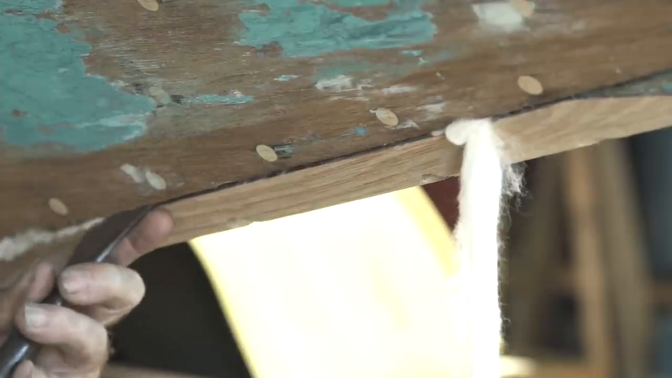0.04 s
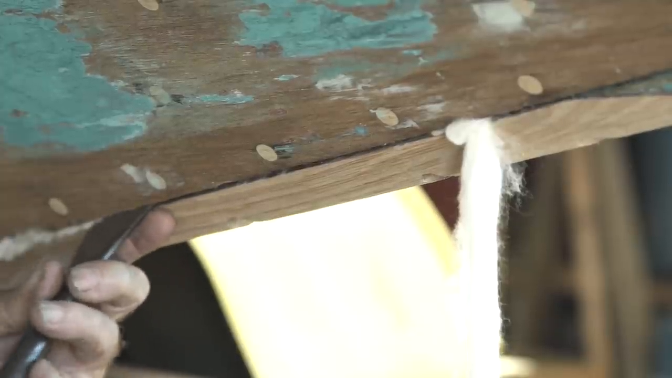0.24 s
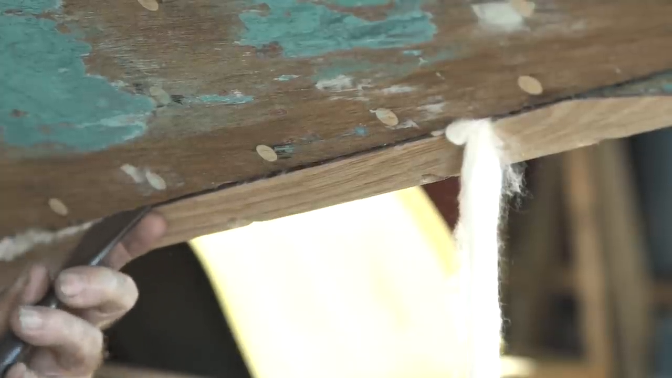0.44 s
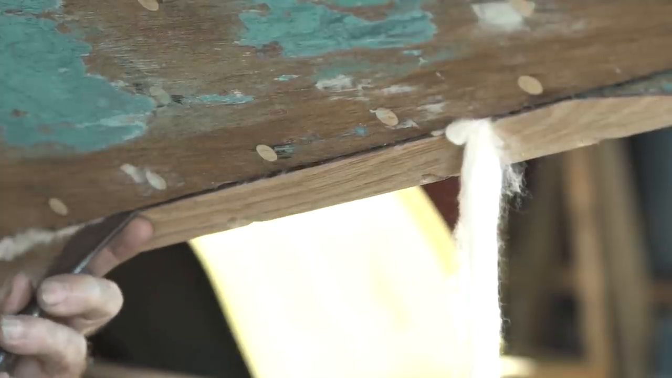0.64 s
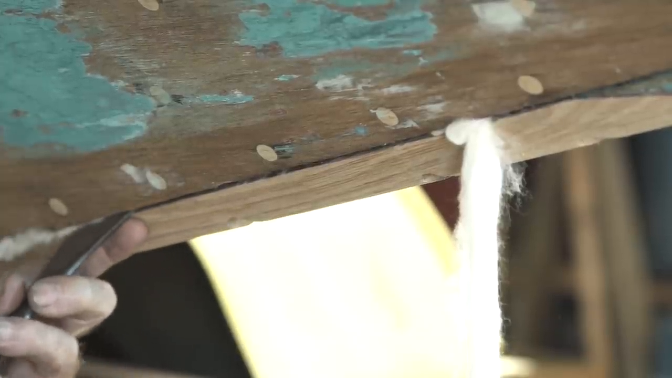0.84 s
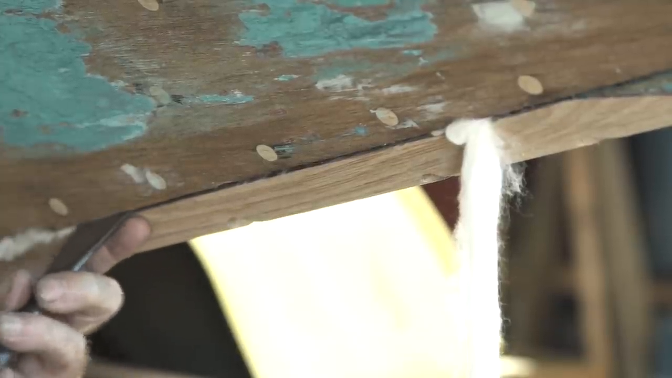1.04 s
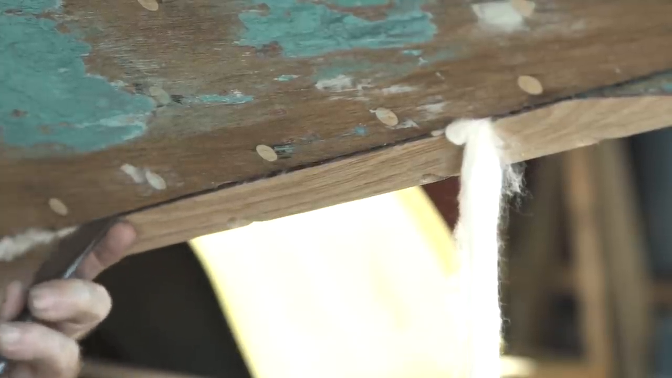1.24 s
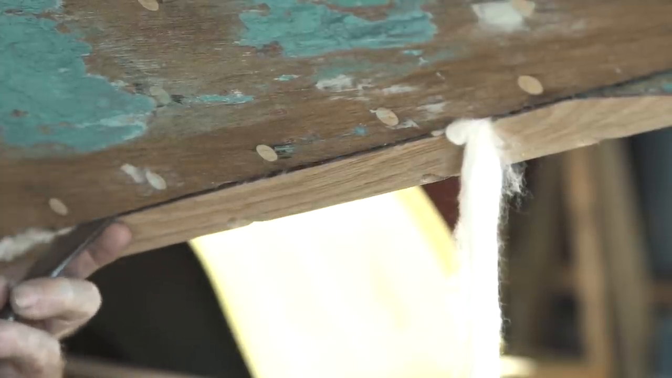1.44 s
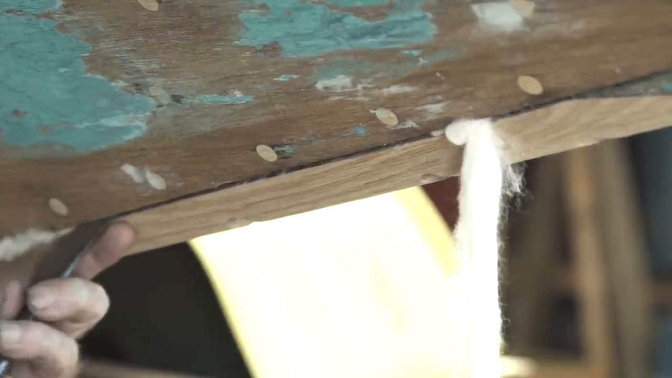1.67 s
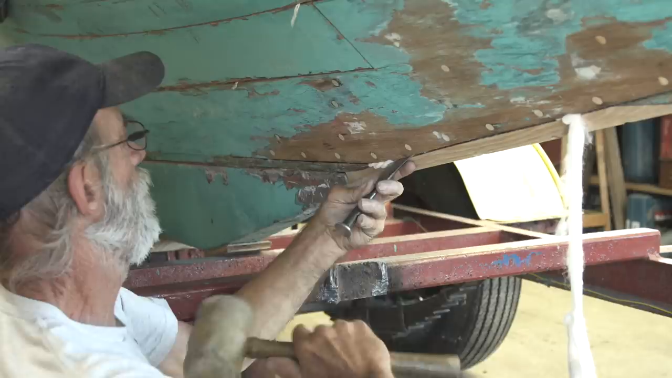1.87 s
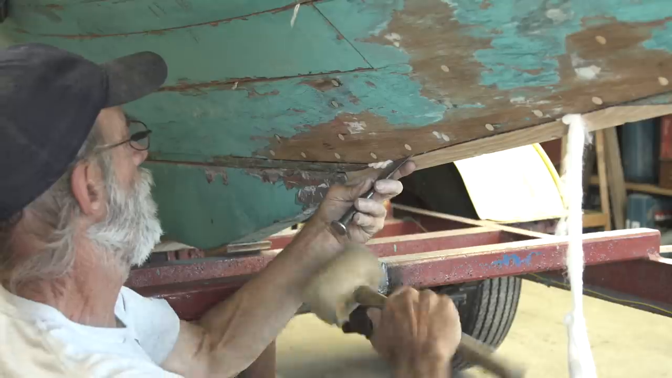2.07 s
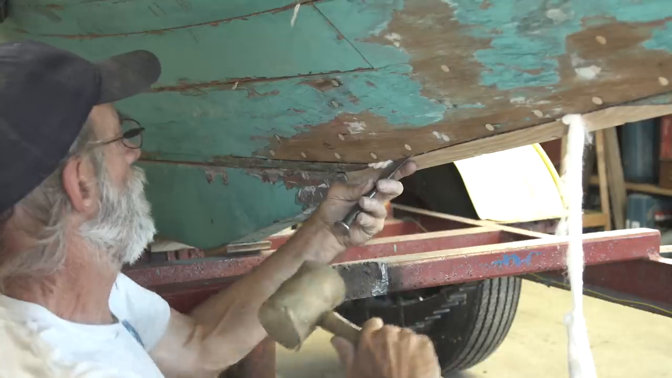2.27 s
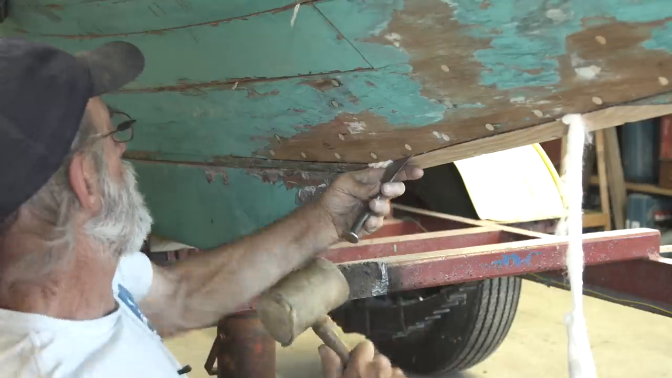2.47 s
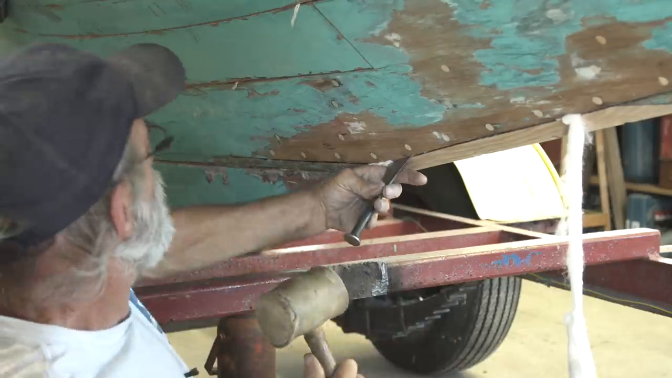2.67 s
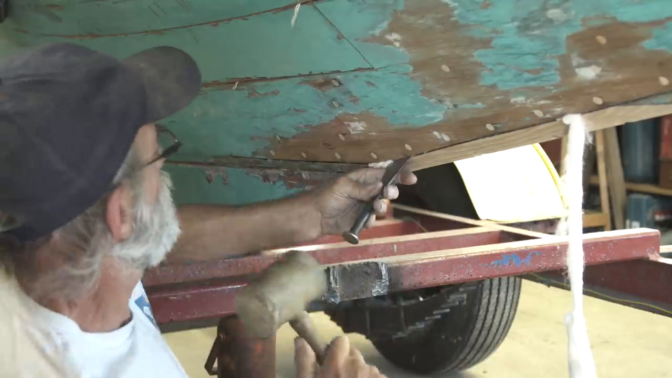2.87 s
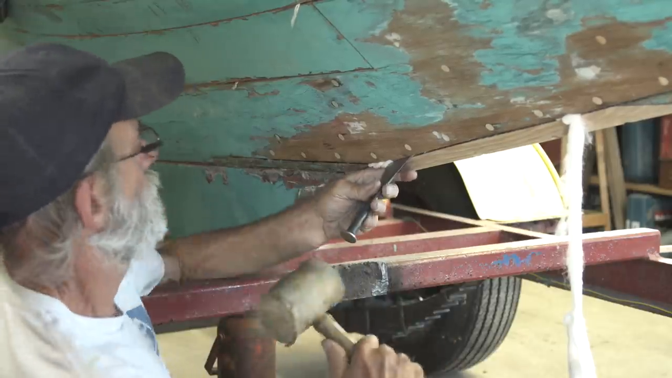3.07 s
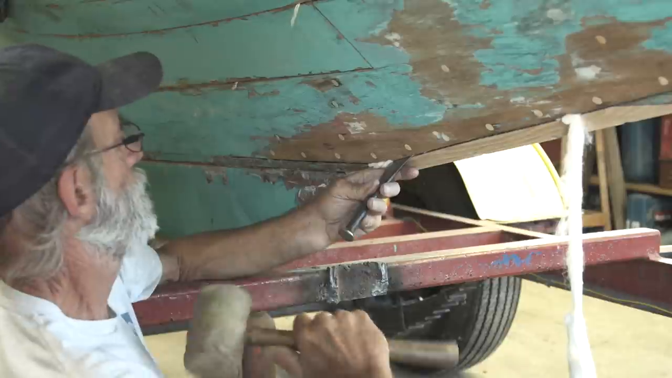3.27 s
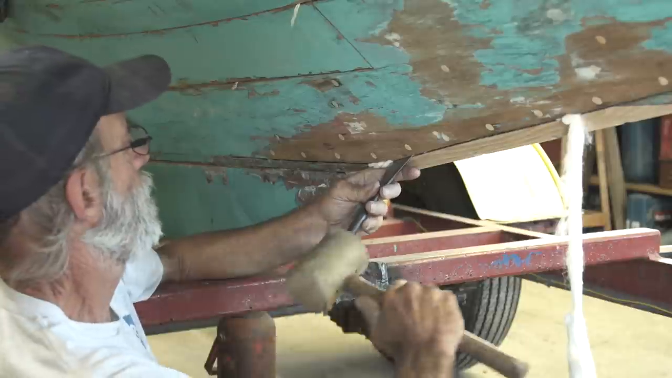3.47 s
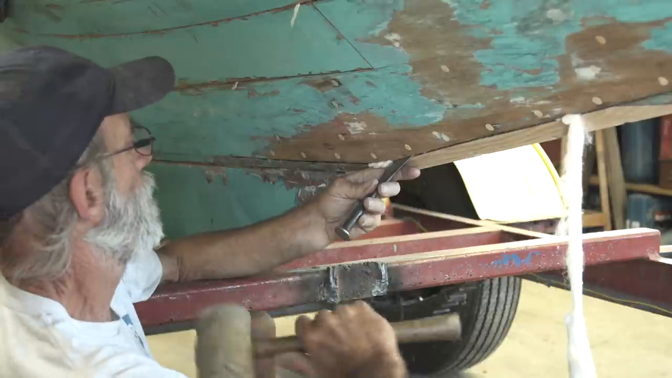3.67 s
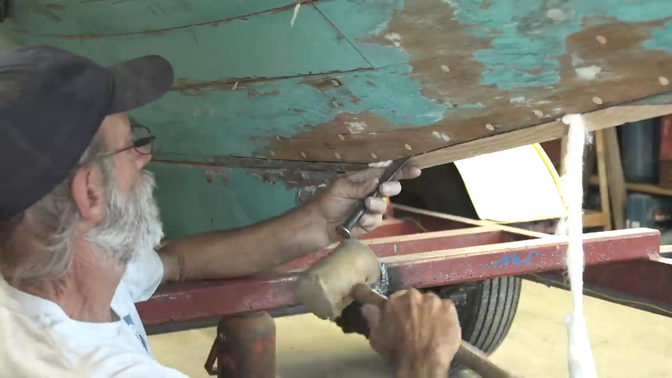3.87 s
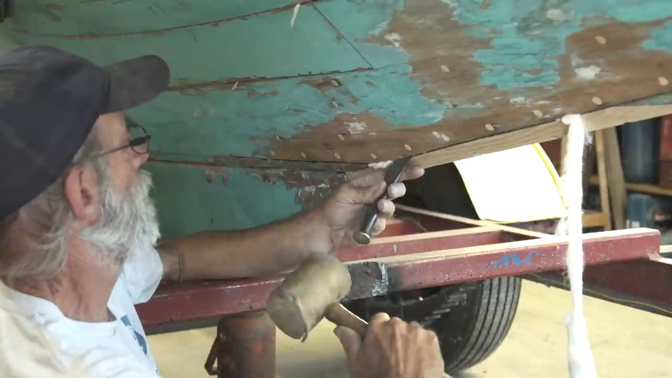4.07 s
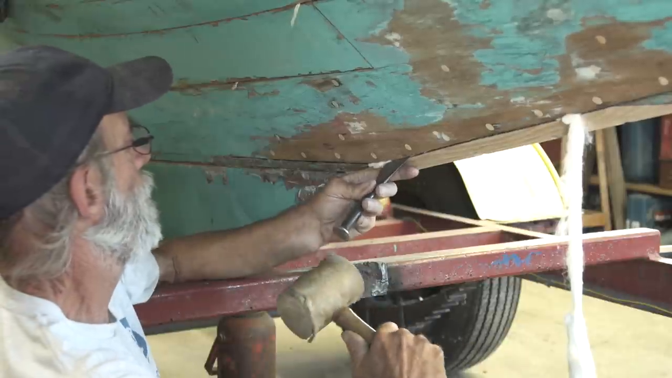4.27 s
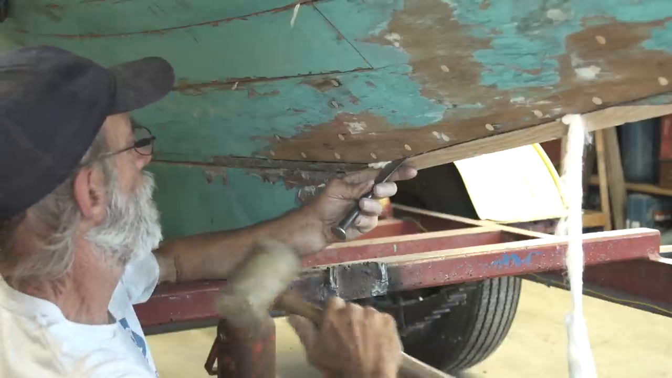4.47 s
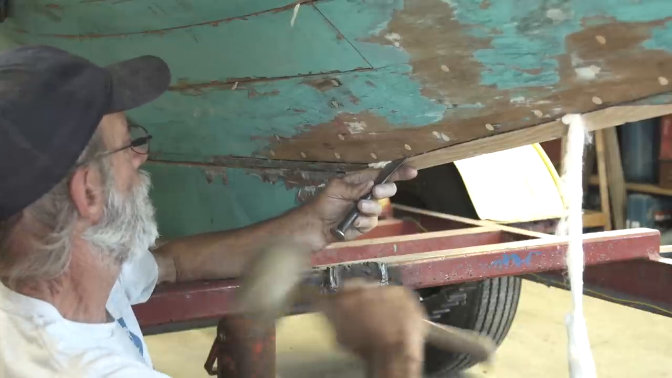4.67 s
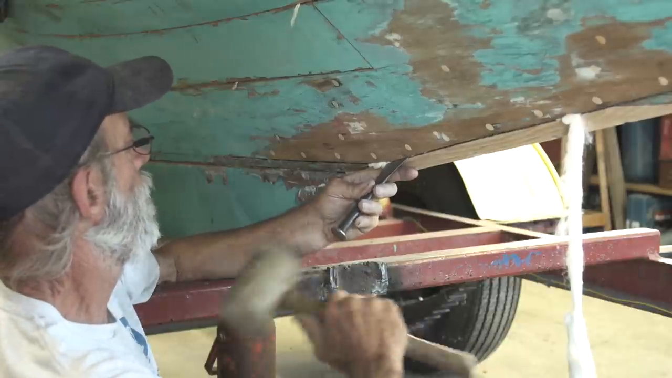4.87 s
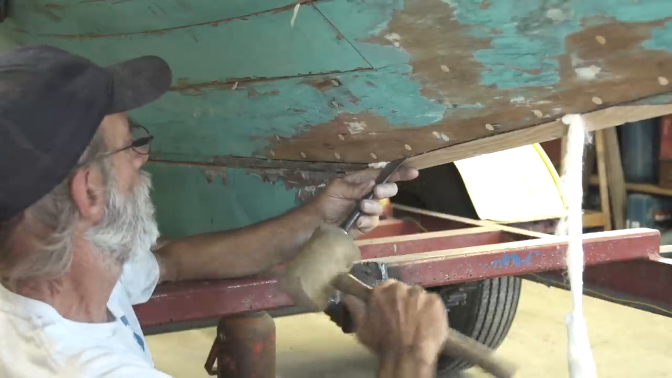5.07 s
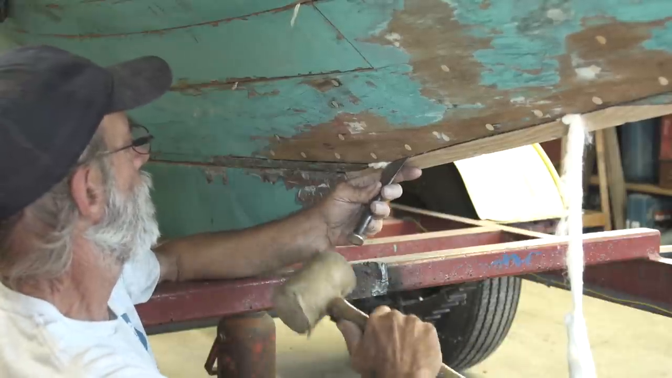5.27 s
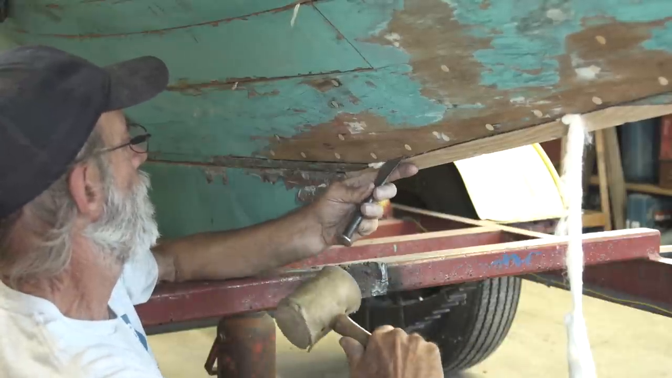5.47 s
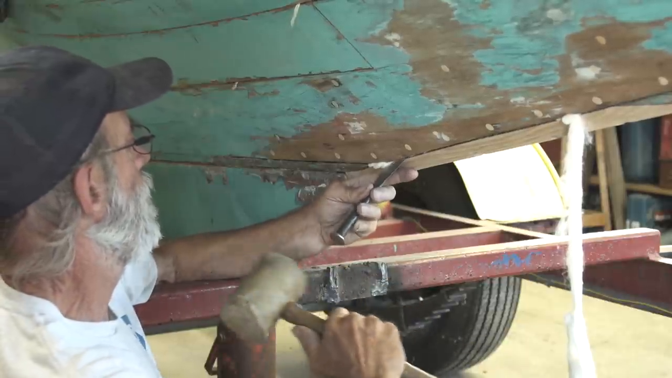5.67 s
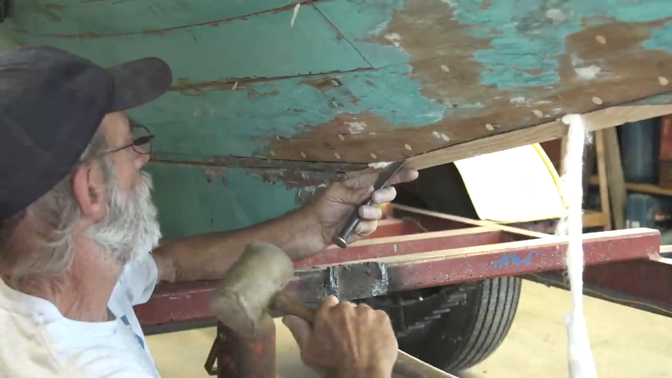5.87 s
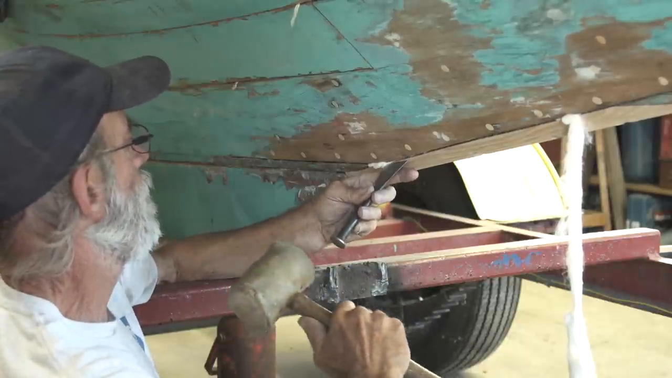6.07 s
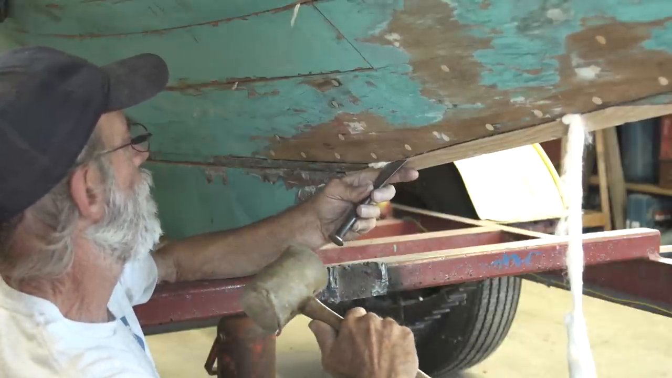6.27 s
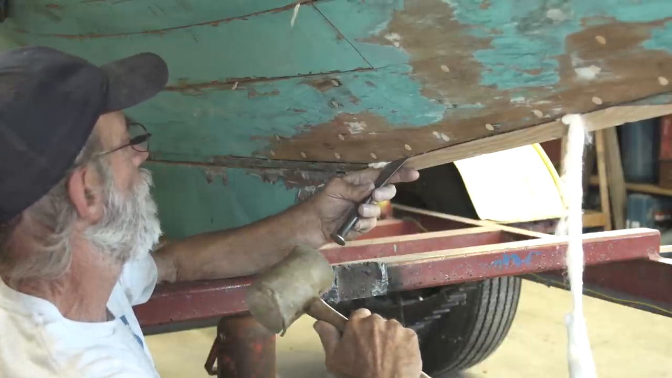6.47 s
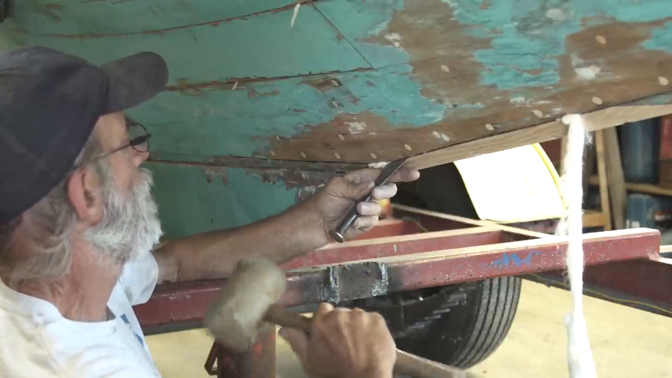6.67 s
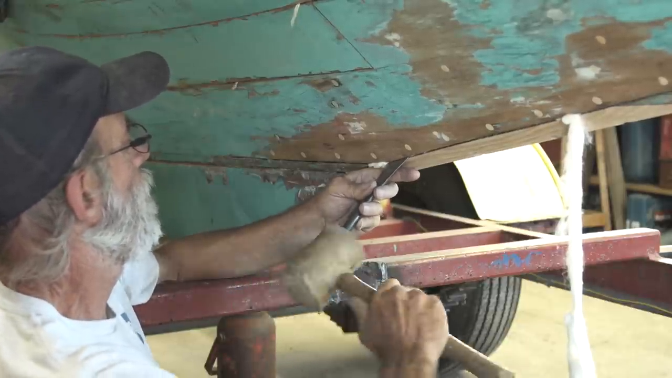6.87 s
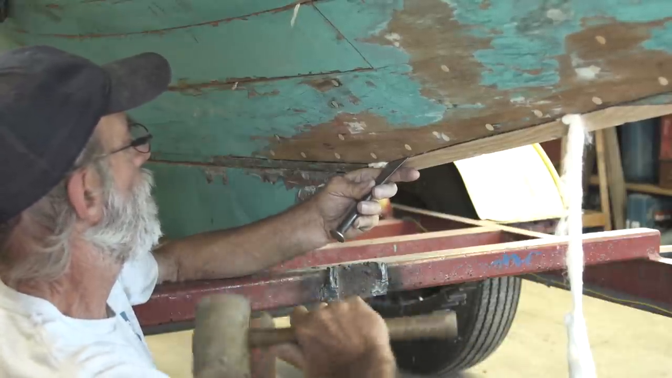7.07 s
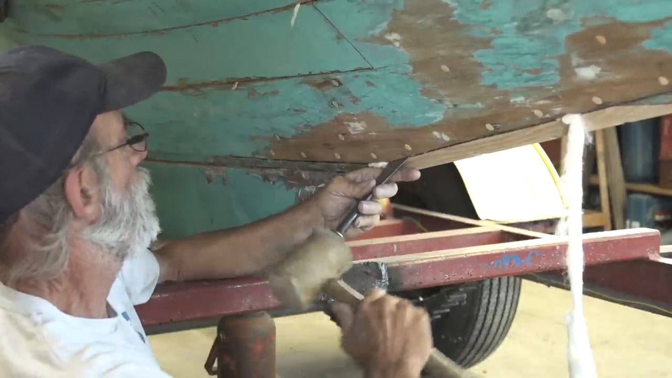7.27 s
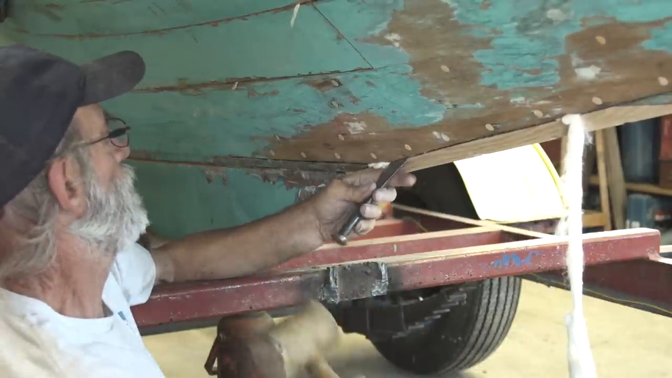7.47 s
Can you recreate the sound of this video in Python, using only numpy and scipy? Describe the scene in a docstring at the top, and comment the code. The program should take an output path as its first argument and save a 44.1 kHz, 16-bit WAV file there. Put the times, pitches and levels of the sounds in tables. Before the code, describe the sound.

Uneven, loud mallet blows on a metal caulking iron resound through a hollow wooden hull, with faint clicks, bumps and rustling in the pauses.

```python
"""A blow is already dying away, and more follow: a mallet drives a caulking iron into a wooden boat's seam.
Each blow, in a shed, sums a noise crack, ringing modes of hull and iron, pushes of air and a noise tail.
Between blows come clicks and soft wooden bumps (short tuned noise), tinkles, a slip and a drumming nudge.
Behind lie shaped-noise air, cloth rustle and a faint hum of wavering sines.
One microphone hears it all, and the loud peaks flatten at its input stage."""
import sys
import numpy as np
from scipy import signal
from scipy.fft import rfft, irfft
from scipy.io import wavfile

SR = 44100
rng = np.random.default_rng(int(sys.argv[2]) if len(sys.argv) > 2 else 0)


def dump(signal):
    """Clip the signal to [-1, 1] and save it as 16-bit WAV at the path in sys.argv[1]."""
    limited = np.clip(np.atleast_2d(signal).T, -1, 1)
    pcm = np.round(limited * 32767).astype(np.int16)
    wavfile.write(sys.argv[1], SR, pcm)


N = 331191
T = np.arange(round(.9 * SR)) / SR  # time within one short sound, s

# colour of the shed's diffuse tail: pitch_hz, level_db (per Hz)
SHED_TONE = [(30, -12.5), (60, -4.5), (100, 5), (300, 1), (520, -0.5), (1100, -2.5), (1450, -5.5),
             (1900, -14), (2800, -10.5), (3700, -20), (5200, -17), (6300, -23.5), (9000, -25.5),
             (15000, -34)]


def mallet(alike=.6):
    """Each blow sums crack, wood, iron and shed; all blows have partly alike tails."""
    # mallet blows: start_s, strength_db, firmness (iron's seat, -1 loose to 1 home), bright_db, ring_db
    blows = [(-.27, 3, -0.97, 2, 2), (0.229, 2, -0.16, -0.5, 0), (1.0392, 0, -.7, -1, 2),
             (1.5427, 0, -0.61, -4, 6), (2.124, -1, 0.66, -5.5, 1.5), (3.527, 0, 0.26, -3, 2),
             (3.8648, -0.65, 0.8, -0.5, 2), (4.7908, 2, -1, -0.5, 0.5), (5.1587, -0.6, 0.56, 0.5, -3),
             (6.9369, -3, -0.62, 3.5, 2), (7.2593, -1, 1, 4.5, -2)]
    dead_until_s, dead_db_per_s = 2.0, 15.5  # a deader stretch of seam: these blows also die faster
    out = np.zeros(N)
    shared = noise(SHED_TONE, len(T))
    for start_s, strength_db, firmness, bright_db, ring_db in blows:
        dead = start_s < dead_until_s
        blow = crack() + planking() + amp(ring_db) * iron() + shed_tail(shared, alike)
        blow = blow * amp(strength_db - dead * dead_db_per_s * T)
        blow = colour(blow, blow_tone(firmness, bright_db, dead))
        add(out, start_s, colour(blow, uneven(1.7)))
    return out


def crack():
    """The hard contact: a burst of noise whose bands die at their own speeds."""
    # colour of the crack: pitch_hz, level_db (per Hz)
    crack_tone = [(60, -29.5), (200, -15), (450, -11), (780, -3), (1200, -2.5), (1800, -8.5), (2700, -6.5),
                  (4000, -12), (7000, -17.5), (15000, -36.5)]
    # decay of the crack: pitch_hz, t60_s
    crack_t60 = [(200, 0.075), (800, 0.058), (2000, 0.029), (8000, 0.035)]
    return amp(-0.5) * dying(noise(crack_tone, len(T)), crack_t60) * swell(0.00049)


def planking():
    """The boom of the planked hull, ringing in its modes, with pushes of air close by."""
    # modes of the planked hull: pitch_hz, level_db, t60_s
    hull_modes = [(76, -10.5, 0.86), (92.6, -5.5, .55), (117.5, -3.5, 0.15), (139.4, -5.5, 0.65),
                  (179.4, -6, 0.79), (235.4, -1.5, .6), (268, -2.5, 0.27), (325.2, 0.5, 0.37),
                  (342.6, -10, 0.59), (426.5, -10.5, 0.84), (483.4, -5, 0.55), (633, -17, 0.37),
                  (796, -7.5, 0.28), (844, -6.5, 0.74), (980, -11.5, 0.35), (1024, -13, 0.46),
                  (1072, -6, 0.53), (1130, -8.5, 0.43), (1211, -8, 0.62), (1370, -12, 0.4)]
    return (amp(-30.0) * ring(hull_modes) + amp(-14.5) * pushes()) * swell(0.0027)


def pushes(count=5, scatter=.03):
    """Air pushes bounce between hull and nearest surfaces, each weaker and higher than the last."""
    gap_s, first_hz, rise_hz, fall_db = .0091, 110, 17, 3.5
    k = np.arange(count)[:, None]
    delay_s = gap_s * (k + 1 + scatter * rng.standard_normal(k.shape))
    u = (np.pi * (first_hz + rise_hz * k) * (T - delay_s)) ** 2
    swings = (1 - 2 * u) * np.exp(-u)  # one swing of pressure each
    return (amp(-fall_db * k) * swings).sum(0)


def iron():
    """The caulking iron rings in its modes, damped by the hand."""
    # modes of the hand-held iron: pitch_hz, level_db, t60_s
    iron_modes = [(2330, -3.5, 0.13), (2750, 0, 0.51), (2760, -2, .42), (3000, -2.5, 0.41),
                  (3850, -13.5, .35), (4360, -9.5, 0.57), (4950, -8.5, .38), (5300, -9, .36),
                  (5780, -12, .5), (6934, -14, .4), (7650, -13, .33), (11700, -19.5, 0.42)]
    return amp(-41.0) * ring(iron_modes, vary_db=0.5)


def shed_tail(shared, alike):
    """The shed's diffuse tail: noise partly shared between blows, dying band by band."""
    # decay of the shed: pitch_hz, t60_s
    shed_t60 = [(100, 0.48), (500, 0.57), (1100, 0.65), (2800, 0.61), (5000, 0.52), (8000, 0.45),
                (14000, .25)]
    diffuse = np.sqrt(alike) * shared + np.sqrt(1 - alike) * noise(SHED_TONE, len(T))
    return amp(-18.0) * dying(diffuse, shed_t60) * swell(0.0037)


def blow_tone(firmness, bright_db, dead):
    """Colour of one blow, from its seat, squareness and place on the seam, as (Hz, dB)."""
    # colour that all blows share: pitch_hz, level_db
    common_tone = [(110, 0.5), (300, -.5), (600, -2.23), (1100, 2.5), (1700, -0.6), (2600, 0.12),
                   (6500, -3)]
    # a firm iron drives the hull's low boom, a loose one thuds: pitch_hz, level_db (per unit of firmness)
    firm_tone = [(110, 2), (300, 7.5), (600, -3.5), (1100, 1), (2600, -.5)]
    # the deader stretch of seam, with less knock: pitch_hz, level_db
    dead_tone = [(110, 0.5), (300, 0), (600, 2), (1100, -6), (1700, 2.5), (6500, -1.5)]
    hz = np.geomspace(50, 16000, 120)
    treble = read([(1500, 0), (8000, 1)], hz)  # a squarer blow is brighter above 1500 Hz
    level_db = read(common_tone, hz) + firmness * read(firm_tone, hz)
    level_db = level_db + bright_db * treble + dead * read(dead_tone, hz)
    return np.c_[hz, level_db]


def uneven(depth_db, count=60):
    """Each blow lands on another spot of the iron's head and favours other overtones, as (Hz, dB)."""
    hz = np.geomspace(1300, 15000, count)
    level_db = depth_db * rng.standard_normal(count)
    level_db[0] = 0  # the pitches below stay as they are
    return np.c_[hz, level_db]


def clicks():
    """The iron and fingers click as the iron is reset: brief bright puffs."""
    # clicks: start_s, level_db, pitch_hz, t60_s, tail_db (cut further in light_contacts)
    click_rows = [(.690, -53.5, 3500, 0.022, -10.5), (.893, -62, 5070, 0.032, -10.5),
                  (2.5665, -32.5, 2900, 0.007, -32), (4.468, -62.5, 4954, .03, -9.5),
                  (4.593, -58.5, 1888, 0.033, -9.5), (4.711, -65.5, 3998, 0.035, -5),
                  (5.538, -52, 3990, 0.036, -9.5), (5.590, -42, 914, 0.029, -9)]
    return light_contacts(click_rows, below_db=2.5, above_db=-10.5, tail_t60=0.38)


def bumps():
    """Soft bumps against wood: low puffs with little treble."""
    # bumps: start_s, level_db, pitch_hz, t60_s, tail_db (cut further in light_contacts)
    bump_rows = [(2.622, -28, 165, 0.041, -12.5), (5.590, -38, 343, 0.098, 1), (5.602, -46, 170, 0.25, -6),
                 (5.742, -48.5, 320, 0.081, -14), (5.851, -44.5, 345, 0.12, -6)]
    return light_contacts(bump_rows, below_db=-10, above_db=-25, tail_t60=0.63)


def light_contacts(rows, below_db, above_db, tail_t60):
    """Each contact is a puff of noise shaped around one pitch, with a weak tail of the shed."""
    out = np.zeros(N)
    for start_s, level_db, hz, t60, tail_db in rows:
        below = [(hz / 8, 2 * below_db), (hz / 2, below_db / 2)]
        above = [(hz * 2, above_db / 2), (hz * 32, 3.5 * above_db)]
        shape = below + [(hz, 0)] + above
        direct = noise(shape, len(T)) * amp(-60 * T / t60)
        tail = noise(shape, len(T)) * amp(tail_db - 7.5 - 60 * T / tail_t60)
        add(out, start_s, amp(level_db) * (direct + tail) * swell(.5 / hz))
    return out


def tinkles():
    """The loosely held iron chatters between blows."""
    # tinkles: start_s, level_db, t60_s (of the chatter)
    tinkle_rows = [(.63, -74, 0.12), (.76, -76, 0.094), (4.23, -69, 0.26), (5.657, -69, 0.38),
                   (5.709, -62.5, .1), (5.91, -76, .08), (6.48, -79, 0.093)]
    out = np.zeros(N)
    for start_s, level_db, t60 in tinkle_rows:
        add(out, start_s, amp(level_db) * chatter(t60))
    return out


def chatter(t60):
    """A quick run of tiny contacts keeps the loose iron ringing unevenly."""
    # modes of the loosely held iron: pitch_hz, level_db, t60_s
    loose_modes = [(4240, 3, .05), (7040, -5, .04), (7250, 0, .03), (11714, -5, .03), (13300, -16, .02)]
    contacts = rng.standard_normal(len(T))
    ringing = evened(signal.fftconvolve(contacts, ring(loose_modes))[:len(T)])
    return ringing * amp(-60 * T / t60)


def blade_slip():
    """The blade slips in the seam: noise with a quick decay over a weaker, slower one."""
    # colour of the slip: pitch_hz, level_db (per Hz)
    slip_tone = [(400, -20), (900, -6), (1750, -8), (2050, 2.5), (2300, -1), (2900, -7.5), (6500, -20),
                 (8800, -10.5), (10500, -23), (15000, -36.5)]
    out = np.zeros(N)
    decay = amp(-60 * T / 0.023) + amp(-13 - 60 * T / .42)
    add(out, 4.3695, amp(-45.5) * noise(slip_tone, len(T)) * decay)
    return out


def hull_nudge():
    """A soft nudge sets the planking drumming in a few low modes."""
    # drumming modes of the planking: pitch_hz, level_db, t60_s
    drum_modes = [(99.5, 3.5, 0.55), (118, -6, 0.31), (217, -10, 0.33)]
    out = np.zeros(N)
    add(out, 2.648, amp(-45.5) * ring(drum_modes, vary_db=0.5) * swell(.006))
    return out


def cloth():
    """Sleeve and cotton rustle as the hand shifts: noise under a wavering level."""
    # rustle level over time: start_s, level_db
    rustle_curve = [(1.9, -100), (2.1, -80), (2.45, -64), (2.7, -69.5), (2.85, -76.5), (3.05, -71.5),
                    (3.3, -78.5), (3.6, -100)]
    rustle_db = np.interp(np.arange(N) / SR, *np.transpose(rustle_curve)) + 1.1 * slow()
    return amp(rustle_db) * noise([(200, -17), (1200, 9), (4000, -2.5), (14000, -7.5)], N)


def hum(waver=.15):
    """A distant motor: steady tones that waver slowly in level and phase."""
    # tones of the motor: pitch_hz, level_db (rms)
    hum_tones = [(96, -66), (180, -67.5), (227, -77.5), (59.2, -75)]
    t = np.arange(N) / SR
    out = np.zeros(N)
    for hz, level_db in hum_tones:
        level = amp(level_db) * np.sqrt(2) * (1 + waver * slow())
        out += level * np.sin(2 * np.pi * hz * t + waver * slow())
    return out


def still_air():
    """Still air in the shed: steady noise, strongest in the bass."""
    # colour of the air: pitch_hz, level_db (per Hz)
    air_tone = [(15, -44.5), (25, -20), (45, -7.5), (75, -6), (120, -7.5), (240, -13), (290, -15),
                (430, -21), (940, -27), (1520, -33), (4000, -43.5), (14000, -50.5)]
    return amp(-64.0) * noise(air_tone, N)


def slow():
    """A slow random drift of rms 1, mostly below 5 Hz."""
    return noise([(1, 0), (5, -6), (30, -60), (200, -140)], N)


def amp(db):
    """Decibels to gain."""
    return 10 ** (np.asarray(db) / 20)


def evened(x):
    """Scales to rms 1."""
    return x / np.sqrt(np.mean(x ** 2) + 1e-20)


def read(points, hz):
    """Reads a table on a log-frequency axis."""
    f, value = np.transpose(points)
    return np.interp(np.log(hz + 1), np.log(f + 1), value)


def add(mix, start_s, sound):
    """Mixes a sound in at its start time; what falls before zero is cut off."""
    start = round(start_s * SR)
    sound = sound[max(-start, 0):]
    part = mix[max(start, 0):][:len(sound)]
    part += sound[:len(part)]


def colour(x, points, size=8192):
    """Causal minimum-phase filter with the given (Hz, dB) curve."""
    log_gain = np.log(amp(read(points, abs(np.fft.fftfreq(size, 1 / SR)))))
    response = np.exp(np.conj(signal.hilbert(log_gain)))
    impulse = np.fft.ifft(response).real[:size // 2]
    return signal.fftconvolve(x, impulse)[:len(x)]


def noise(points, size):
    """Noise of rms 1 with the given (Hz, dB) spectrum."""
    gain = amp(read(points, np.fft.rfftfreq(size, 1 / SR)))
    return evened(irfft(rfft(rng.standard_normal(size)) * gain, size))


def dying(x, t60s):
    """Lets each band of x die at its own speed."""
    hz, spectrum = np.fft.rfftfreq(len(T), 1 / SR), rfft(x)
    centres, times = np.transpose(t60s)
    out = np.zeros(len(T))
    for share, t60 in zip(np.eye(len(times)), times):
        # overlapping bands that add up to the whole
        band = irfft(spectrum * read(np.c_[centres, share], hz), len(T))
        out += band * amp(-60 * T / t60)
    return out


def ring(modes, vary_db=4.5):
    """Struck modes as dying sines; each strike excites them a little differently."""
    hz, db, t60 = np.transpose(modes)[:, :, None]
    db = db + vary_db * rng.standard_normal(hz.shape)
    signs = (-1) ** np.arange(len(hz))[:, None]
    return (signs * amp(db - 60 * T / t60) * np.sin(2 * np.pi * hz * T)).sum(0)


def swell(seconds):
    """A smooth rise from silence."""
    return 1 - np.exp(-(T / seconds) ** 2)


def scene():
    """All sources at one microphone."""
    work = mallet() + clicks() + bumps() + tinkles() + blade_slip() + hull_nudge()
    return (work + cloth() + hum() + still_air())[None]


def record(dry, hardness=32.0):
    """The input stage flattens the peaks; then the top end, the volume and the band limit."""
    # the microphone's soft top end: pitch_hz, level_db
    top_end = [(9000, 0), (15000, -1.5)]
    # overall volume, lower during the first blows: start_s, level_db
    volume = [(1.93, -6.5), (2.0, -0.5)]
    ceiling_db, edge_hz = -13.5, 16100
    drive = signal.resample_poly(dry[0], 3, 1) / amp(ceiling_db)  # oversampled against aliasing
    flat = drive / (1 + abs(drive) ** hardness) ** (1 / hardness)
    clipped = signal.resample_poly(flat, 1, 3) * amp(ceiling_db)
    volume_db = np.interp(np.arange(N) / SR, *np.transpose(volume))
    out = colour(clipped, top_end) * amp(volume_db)
    low_pass = signal.firwin(401, edge_hz, window=("kaiser", 9), fs=SR)
    return signal.oaconvolve(out, low_pass, "same")[None]


dry = scene()
out = record(dry)
dump(out)
```